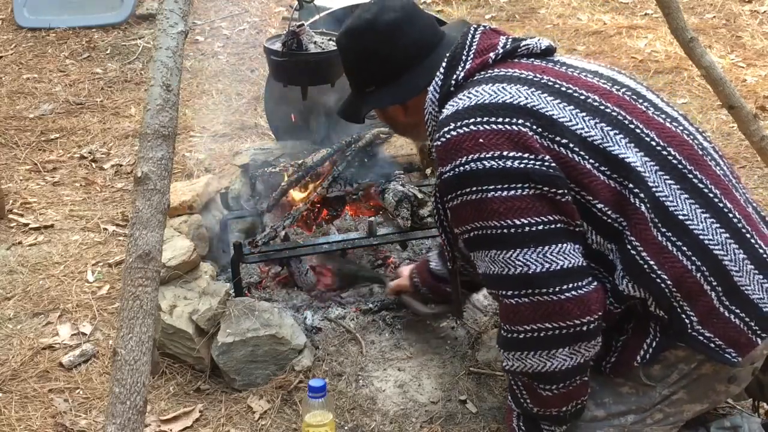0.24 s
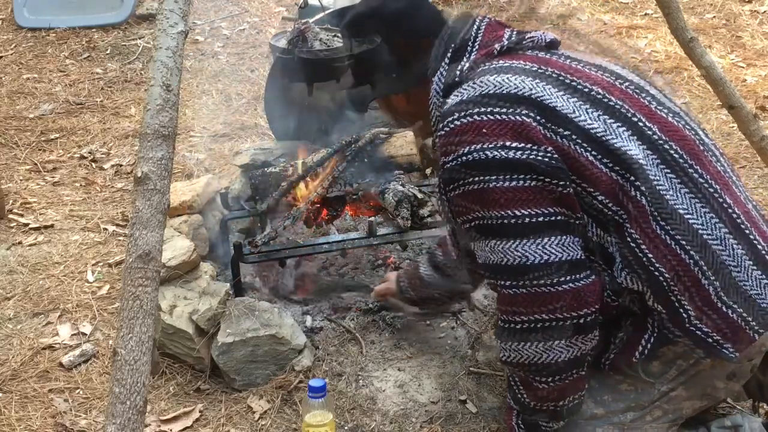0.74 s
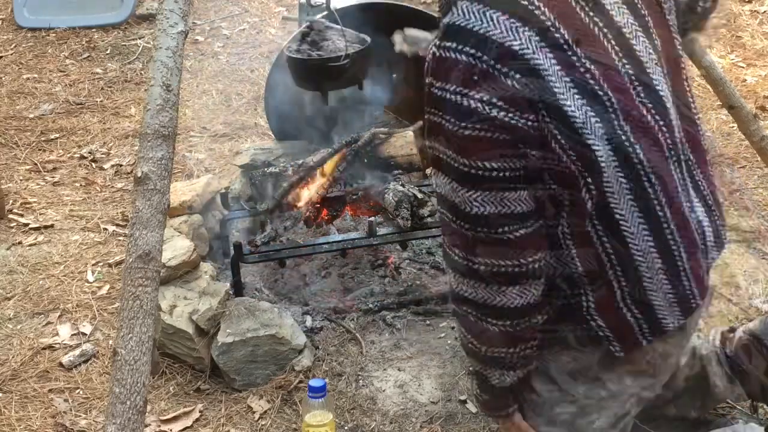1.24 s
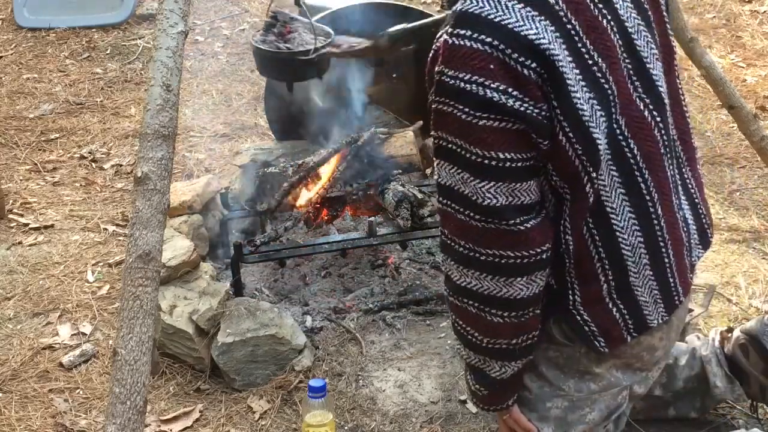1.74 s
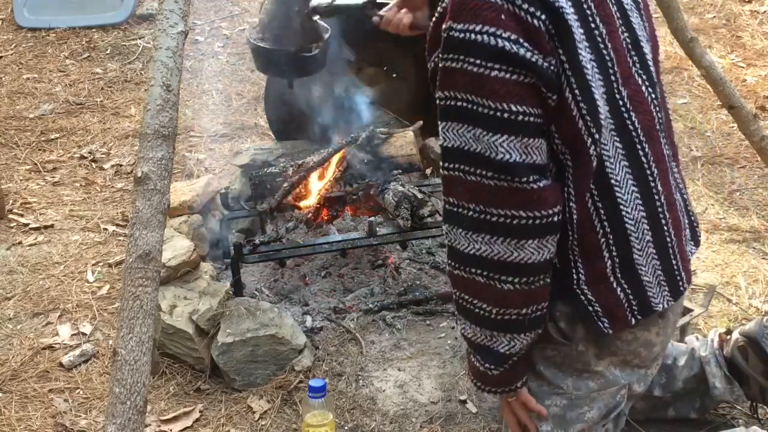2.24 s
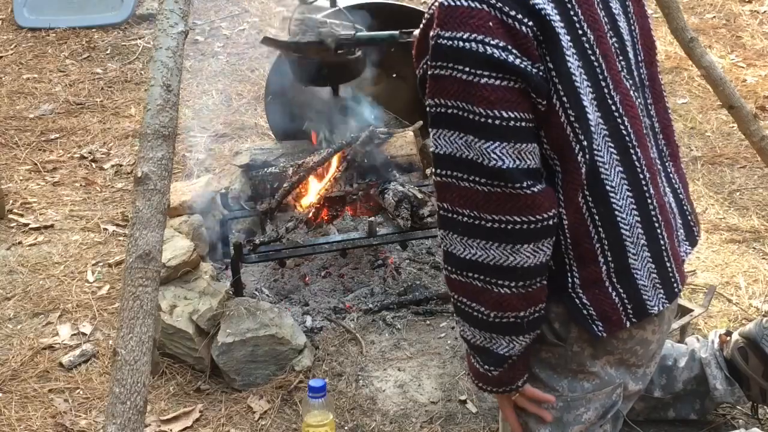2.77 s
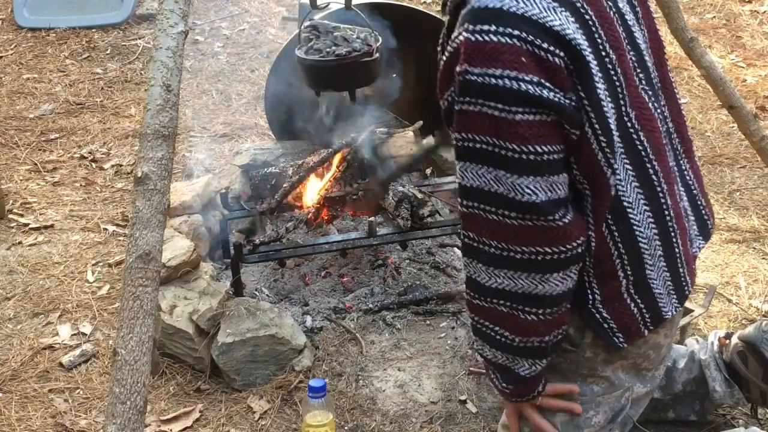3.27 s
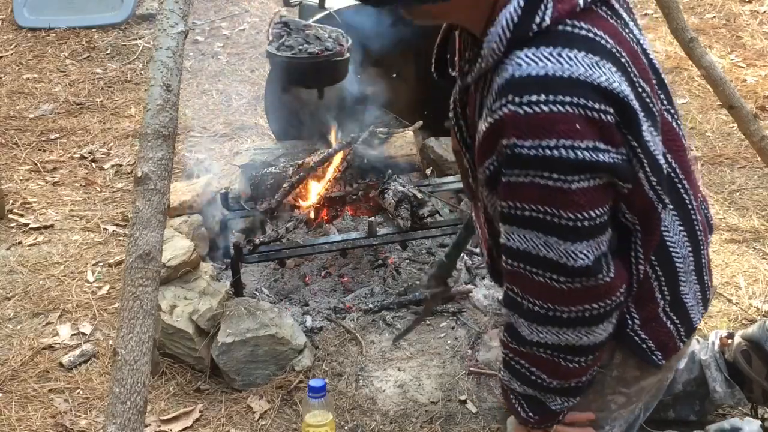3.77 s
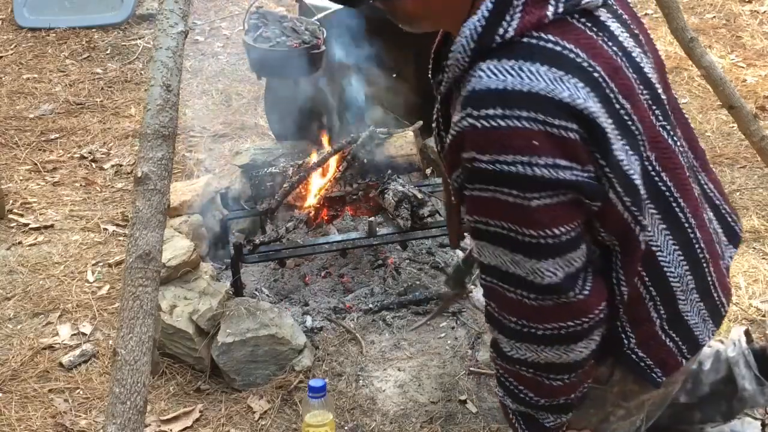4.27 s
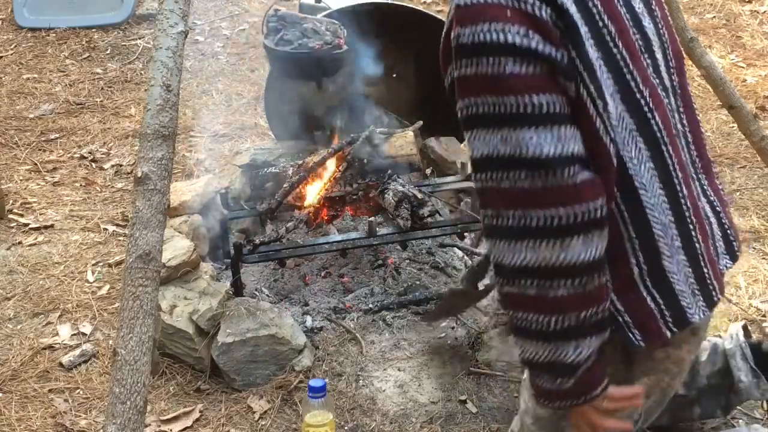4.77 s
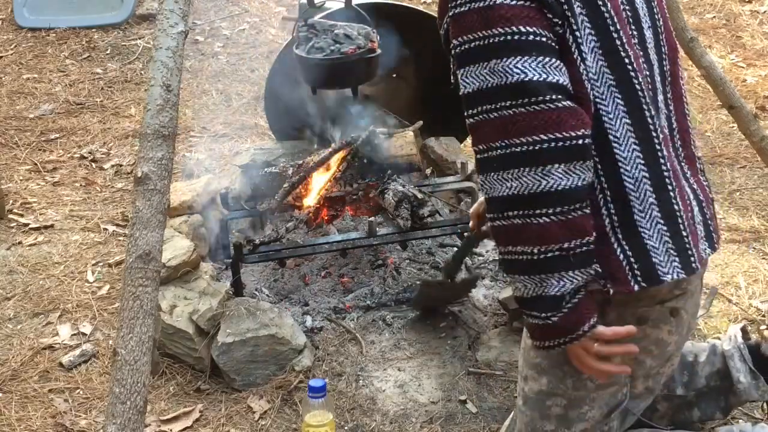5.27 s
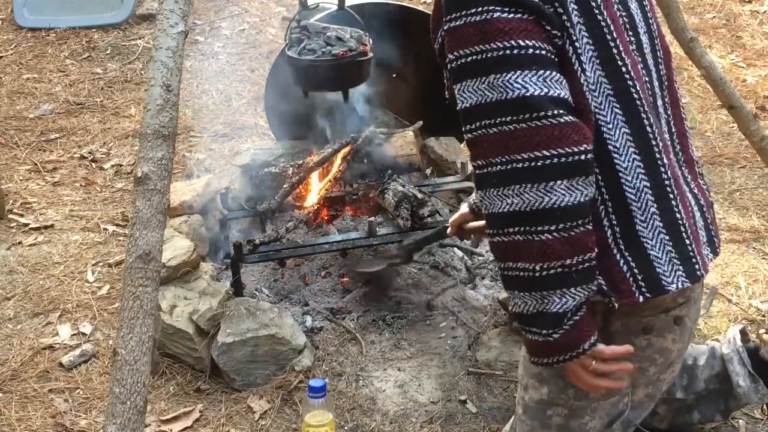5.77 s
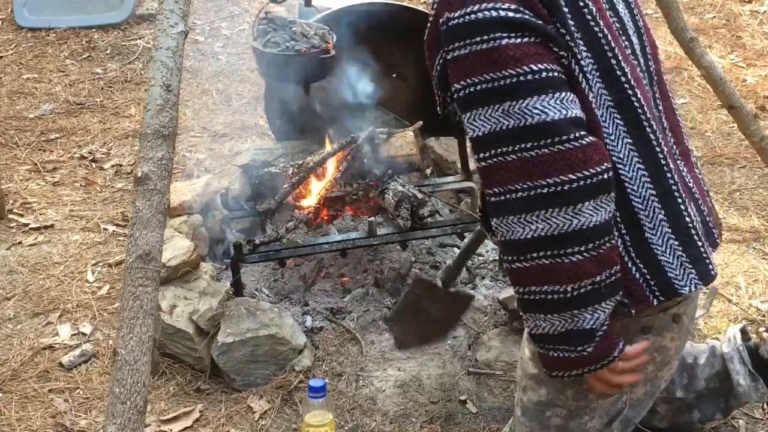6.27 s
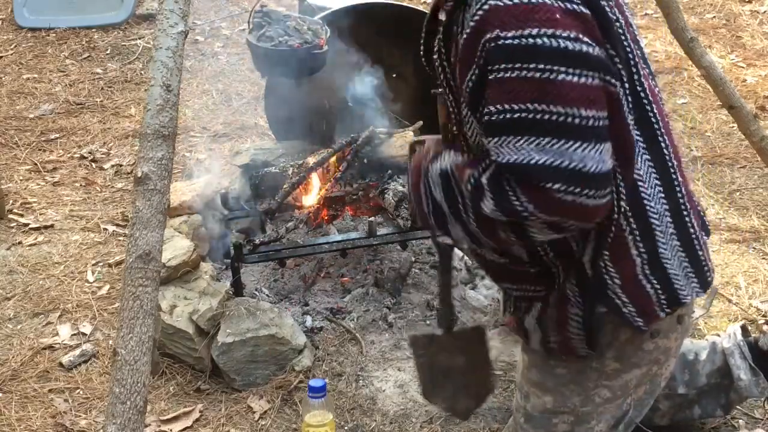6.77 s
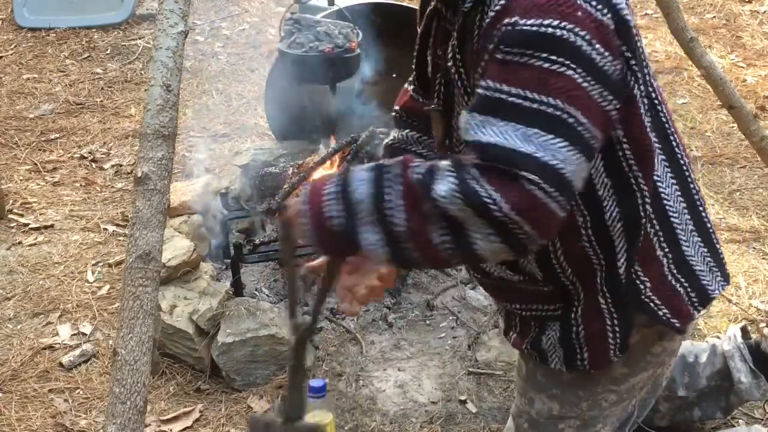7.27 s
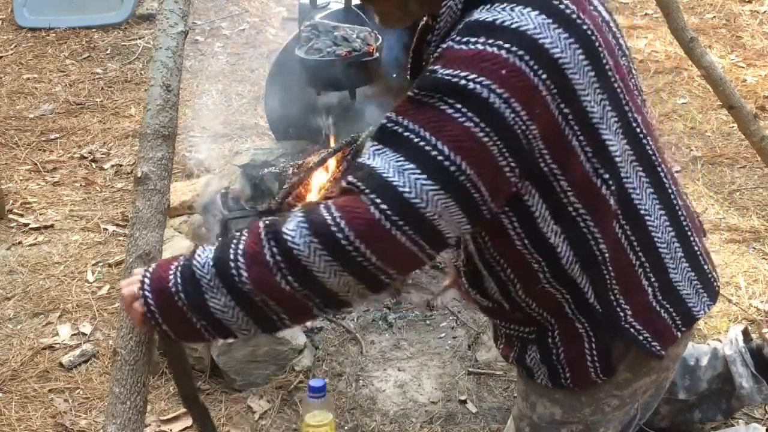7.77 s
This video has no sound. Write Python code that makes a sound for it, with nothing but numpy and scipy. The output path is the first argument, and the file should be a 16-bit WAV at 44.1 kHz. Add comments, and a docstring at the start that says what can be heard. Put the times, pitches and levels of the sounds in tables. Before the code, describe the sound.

Outdoors, close to a small fire, a steel shovel pushes through embers from 0 to about 1 second: short gritty scrapes, small stony crunches and a brief edge squeal. Then it is quiet, with sparse dry fire ticks, soft low rumble, thin hiss and a faint low hum. At 2.3 seconds the shovel hits an iron pot, a single loud, hard clang, by far the loudest sound. Its dense crash dies quickly, leaving a clear, gently pulsing note around 1200 hertz that fades until it is damped near 4 seconds; a faint tail returns from trees. Small bright clinks come around 3 and 4.1-4.4. Quieter scraping, a squeal and soft bumps run from 5.1 to 6.1, with clinks and light handle knocks from 6.3 to 7.4. Very faint high bird chirps sound at 7.2-7.7. At 7.75 the blade stabs gritty soil with a strong short crunch and knock.

```python
"""Iron and steel at a campfire

A small steel shovel scoops embers as grain noise, strikes an iron pot once and sings on as damped modes,
then scrapes the ash again and is stabbed into the ground in bursts of noise and short modes. Loose metal
fittings clink in two banks of modes, the edge squeals in narrow-band noise, the handle knocks and the fire
ticks. A faint decaying tail answers from the trees, over rumble, a rush of air, hiss, a low hum and a bird."""
import sys
import numpy as np
from scipy import signal
from scipy.fft import rfft, irfft, next_fast_len
from scipy.io import wavfile
from scipy.ndimage import map_coordinates

SR = 44100
rng = np.random.default_rng(int(sys.argv[2]) if len(sys.argv) > 2 else 0)


def persist_wave(psi):
    """Save psi, clipped to +-1, as 16-bit WAV."""
    counts = np.round(np.clip(psi, -1, 1) * 32767).astype(np.int16)
    wavfile.write(sys.argv[1], SR, np.atleast_2d(counts).T)


N = 353682
TIME = np.arange(N) / SR

# Modes of blade and pot struck together. Each row: frequency in Hz, relative level in dB, t60 in s.
IRON_MODES = [(190, -24, .13), (440, -24, .1), (606, -24, .11), (680, -26, .11), (729, -27, .18),
              (875, -26, .14), (915, -21, .17), (1079, -22, .13), (1200, -20, .17), (1312, -20, .14),
              (1478, -20, .13), (1573, -20, .12), (1760, -21, .13), (1884, -10, .18), (2064, -21, .15),
              (2189, -23, .13), (2359, -21, .16), (2429, -25, .14), (2576, -21, .17), (2692, -23, .14),
              (3351, -17, .26), (3590, -26, .15), (3690, -21, .19), (3818, -29, .17), (4448, -24, .19),
              (4616, -32, .28), (5308, -25.5, .22), (5953, -26, .22), (6117, -26, .16), (8920, -31, .12)]
# Spectrum of the blow's dense weak modes. Each row: frequency in Hz, relative density in dB.
CRASH_SPECTRUM = [(30, -50), (100, -23), (300, -20), (460, -8), (900, -12), (1500, -6), (2600, -11.5),
                  (3050, -17.5), (3600, -5.5), (4200, -16), (5600, -11.5), (7500, -16.5), (8200, -22.5),
                  (12200, -21.5), (15200, -33)]
# Decay of those weak modes. Each row: frequency in Hz, t60 in s.
CRASH_DECAY_TIMES = [(150, .12), (500, .13), (1500, .14), (3500, .15), (6000, .175), (10000, .155),
                     (15000, .135)]
# Modes of the freed blade. Each row: frequency in Hz, relative level in dB, t60 in s before shared losses.
BLADE_MODES = [(1205.5, 0, 90), (1039, -17, 2), (1965, -9.5, 1.1), (3357, -19, .6), (3612, -8, .62),
               (4619, -26, .35), (5280, -26, .5), (5958, -18, .33)]
# The blade's note fades evenly, swells slowly, drops a step as the blade turns away, and is damped at last.
SING_DB, SING_FADE_DB_PER_S = -26, 16.5
SWELL_PER_S, SWELL_DB = 2.67, 1.4
TURN_AFTER_S, TURN_TAKES_S, TURN_DB = 0.42, 0.11, -5
DAMPED_AFTER_S, DAMPED_DB_PER_S = 1.59, 78
CLANG_S = 2.337
GRAZE_S, GRAZE_DB, GRAZE_HZ = 0.03, -50, 2300  # the blade grazes the pot just before the blow

# Pushes of the shovel through embers. Each row: start in seconds, length in s before release,
# level in dB, pressure 0-1.
PUSH_EVENTS = [(0, 0.078, -58, 0.4), (0.077, 0.048, -44, 0.8), (0.169, 0.042, -51.5, 0.73),
               (0.289, 0.024, -50, 0.45), (0.332, 0.093, -45.5, 0.48), (0.425, 0.13, -53, 1),
               (.562, 0.079, -51.5, 0.6), (0.677, 0.2, -66, 0.55), (0.772, 0.029, -58, .85),
               (0.935, 0.21, -75, 0.8), (5.127, 0.027, -52.5, 0.03), (5.151, 0.026, -46.5, 0.18),
               (5.215, 0.038, -49, 0.5), (5.328, .013, -58.5, .4), (5.386, 0.033, -59, .6),
               (5.48, 0.096, -64, .3), (5.563, 0.28, -55.5, 0.11), (5.909, 0.026, -62.5, 0.2),
               (6.123, 0.019, -59, 0), (7.746, 0.026, -43.5, 0.8)]
PUSH_ATTACK_S, PUSH_SAG_DB_PER_S, PUSH_RELEASE_T60_S = 0.012, 22.5, 0.18
# Spectrum of sliding embers. Each row: frequency in Hz, relative density in dB.
GRIT_SPECTRUM = [(1180, -53), (2000, -5.5), (5490, -2), (6360, 2), (7250, -0.5), (14300, 1), (15600, -2),
                 (16000, -35.5)]
# Spectrum of the pressed blade's rasp. Each row: frequency in Hz, relative density in dB.
RASP_SPECTRUM = [(200, -4), (450, 2), (850, -3.5), (1300, -0.5), (2500, -7.5), (5000, -6), (7500, -12.5),
                 (12000, -6.5), (15500, -33)]
# Resonances of the blade while it rubs. Each row: frequency in Hz, bandwidth in Hz, relative level in dB.
STEEL_RESONANCES = [(1320, 110, -10), (2430, 260, -9.5), (3490, 170, -10), (5180, 67, -15), (6170, 19, 0),
                    (7330, 73, -15), (8700, 62, -11), (10200, 460, -13.5), (10200, 77, -23),
                    (12100, 180, -22)]

# The edge catches. Each row: start in seconds, length in s, level in dB, favoured frequency in Hz.
CATCH_EVENTS = [(.38, 0.044, -38, 1290), (0.441, .22, -57, 1960), (0.6, 0.026, -46.5, 5100),
                (0.836, 0.32, -78, 6300), (5.225, 0.062, -44.5, 2730), (6.29, 0.063, -58, 12400),
                (6.371, 0.045, -52.5, 2900), (7.797, 0.037, -47, 5150)]
# Notes at which the edge squeals. Each row: frequency in Hz, width in Hz, relative level in dB.
EDGE_NOTES = [(1290, 130, -21), (1954, 13, -8), (2470, 23, -12.5), (2920, 36, -10), (5060, 110, -12.5),
              (6335, 66, 0), (7350, 90, -15), (12400, 590, -17)]
FAVOUR_DB = 17.5  # lift of the note on which the edge catches

# The blade bites stony soil and embers. Each row: start in seconds, time it keeps sinking in s,
# relative level in dB, relative body level in dB.
BITE_EVENTS = [(0.076, .005, -38, -14), (.103, .005, -25, -12), (.347, .005, -32.5, -32),
               (.385, .028, -28.5, -13), (.607, .005, -33, -27), (7.764, .039, -13.5, -7.5)]
# Spectrum of the crunch. Each row: frequency in Hz, relative density in dB.
SOIL_SPECTRUM = [(88, -50), (150, -2), (391, -32), (524, -8), (1260, 3), (2220, -10), (2450, -12),
                 (3920, 2), (4760, -4.5), (6260, -1), (12700, -13.5), (15100, -26), (16000, -43)]
CRUNCH_GAP_S, CRUNCH_LOSS_DB, BODY_LOSS_DB = 0.0108, 0.2, 3  # from one stone giving way to the next

# Contacts of the loose metal. Each row: start in seconds, relative level in dB, brightest frequency in Hz,
# hook share 0-1.
CLINK_EVENTS = [(2.967, -36, 5120, 0.43), (3.032, -46.5, 12500, 0.35), (3.1, -46.5, 12450, 0.17),
                (4.079, -43.5, 10400, .3), (4.157, -42.5, 5400, 0.46), (4.308, -27, 6450, 0.08),
                (4.403, -33, 5800, 0.34), (5.398, -44.5, 3440, 0), (6.288, -39.5, 12200, 0.2),
                (6.34, -46.5, 5060, .7), (6.375, -43.5, 2950, 0.33), (6.973, -35.5, 5030, 0.4),
                (7.099, -42.5, 11740, 0.15)]
# Modes of the pot hanger's bail. Each row: frequency in Hz, relative level in dB, t60 in s.
BAIL_MODES = [(1820, -23.5, 0.3), (2800, -30, 0.079), (3830, -24, 0.31), (5170, -9.5, 0.11),
              (5800, -27, 0.13), (5930, -6.5, 0.088), (6000, -16, .09), (7100, -18, 0.26),
              (7910, -13.5, .09), (8600, -14, .2), (9380, -13, 0.09), (10700, -11, 0.1), (11650, -22, 0.37),
              (12040, -18, .09)]
# Modes of its hook. Each row: frequency in Hz, relative level in dB, t60 in s.
HOOK_MODES = [(3550, -5, 0.1), (4790, -26, 0.07), (4870, -18, 0.11), (5230, -12.5, 0.083),
              (5310, -2.5, 0.076), (5800, -24, 0.031), (6400, -10.5, 0.11), (6570, -5.5, 0.15),
              (9150, -2.5, 0.13), (10100, -6.5, 0.12), (11950, -3.5, 0.12), (12350, -14, 0.32),
              (13240, -13, 0.23)]
REBOUND_S, REBOUND_DB = 0.01, -9.5  # mean gap between touches of one contact; level change at each

# Knocks of the shovel's handle and socket. Each row: start in seconds, rattling time in s,
# then relative levels in dB of the whole, the thud and the edge.
KNOCK_EVENTS = [(5.2651, .01, -42, -3, 10.5), (5.9332, .03, -53, 2.5, 0), (6.4402, .01, -33, -22, -18),
                (7.3264, .01, -33, -16, -26), (7.3366, .03, -36.5, -19, -16),
                (7.3841, .05, -38.5, -11, -12), (7.7156, .01, -32.5, -29, 3), (7.87, .01, -34, -1, -4.5)]
# Modes of the held handle. Each row: frequency in Hz, width in Hz, relative level in dB.
HANDLE_MODES = [(1400, 29, -1.5), (2180, 51, -1), (2340, 29, 4.5), (2880, 22, -22), (3750, 24, -5),
                (4000, 22, -10.5)]
RATTLE_GAP_S, RATTLE_LOSS_DB = 0.019, 2  # from one contact of a rattle to the next
# Soft bumps on the ground. Each row: start in seconds, peak level in dB, frequency in Hz.
BUMP_EVENTS = [(0.569, -54, 126), (5.2, -57, 150), (5.262, -41, 185), (5.334, -49.5, 130),
               (5.933, -48, 107), (7.873, -57, 254)]

# Clear snaps of the fire. Each row: start in seconds, relative level in dB, centre frequency in Hz.
SNAP_EVENTS = [(.179, -36.5, 4200), (0.5258, -31.5, 9100), (.9229, -46, 6400), (1.0933, -37, 9300),
               (1.94, -48, 3340), (3.245, -45.5, 4600), (3.9934, -40.5, 5140), (4.261, -40, 5200),
               (4.4815, -36, 3800), (4.5248, -35, 4900), (5.1188, -36.5, 4100), (5.449, -32, 6000),
               (5.8373, -38, 9000), (5.9199, -40, 3300), (6.5795, -40.5, 5070), (6.9154, -36, 13000)]

# Decay of the trees' answer. Each row: frequency in Hz, t60 in s.
TREE_DECAY_TIMES = [(150, .5), (1000, 1.0), (2200, 1.4), (4000, 0.86), (8000, .65), (15000, 0.46)]
# Spectrum of the open air. Each row: frequency in Hz, relative density in dB.
AIR_SPECTRUM = [(15, -49.5), (25, -15), (70, -2), (123, -3), (200, -10), (270, -17.5), (317, -15.5),
                (489, -21), (575, -23.5), (1100, -23.5), (3080, -28.5), (5140, -32), (12200, -36),
                (14400, -36), (16000, -53)]
# Swell of the far rush of air. Each row: time in seconds, mean level in dB.
RUSH_LEVELS = [(0, -70.5), (2.2, -67), (4.6, -63), (6.5, -65), (8.02, -65.5)]
RUMBLE_DB, HISS_DB = -59.5, -71.5
HUM_DB, HUM_FADES_AT_S, HUM_FADE_DB_PER_S = -61.5, 2.63, 18  # a far low hum that dies away
HUM_HZ, HUM_RISE_HZ_PER_S = 119, 3
# A far bird's run of thin calls, with mean pitch at the top of the arch and mean level.
BIRD_START_S, BIRD_GAP_S, CHIRP_S, BIRD_HZ, BIRD_DB = 7.16, 0.103, 0.068, 7390, -76
TREES_DB = -31.5
TOP_HZ = 15500


def amp(db):
    """Decibels are a logarithmic measure of gain."""
    return 10 ** (np.asarray(db) / 20)


def unit(x):
    """Normalisation by mean power: rms 1."""
    return x / np.sqrt(np.mean(x ** 2) + 1e-20)


def peaked(x):
    """Normalisation by largest excursion: peak 1."""
    return x / np.abs(x).max()


def along(points, hz):
    """Interpolation of (Hz, value) points on a logarithmic frequency axis."""
    f, v = np.transpose(points)
    return np.interp(np.log(hz + 1), np.log(f + 1), v)


def wobble(rate):
    """Slow random modulation: a smooth curve through random knots, rate of them a second."""
    knots = rng.standard_normal(int(N * rate / SR) + 4)
    return map_coordinates(knots, [TIME * rate])


def filtered(x, response):
    """Linear filtering: the spectrum of x times a response of frequency."""
    m = next_fast_len(len(x) + 1024)
    return irfft(rfft(x, m) * response(np.fft.rfftfreq(m, 1 / SR)), m)[:len(x)]


def noise(response, size=N):
    """Coloured noise: filtered white noise, rms 1."""
    return unit(filtered(rng.standard_normal(size), response))


def shape(points):
    """Spectral envelope: the response through (Hz, dB) points."""
    return lambda hz: amp(along(points, hz))


def hump(hz, centre, octaves):
    """Broad resonance: a bell on the logarithmic frequency axis, with its deviation in octaves."""
    return np.exp(-0.5 * (np.log2((hz + 1) / centre) / octaves) ** 2)


def fade(t60, size):
    """Exponential decay: 60 dB lost in t60 seconds."""
    return amp(-60 * TIME[:size] / t60)


def ring(modes, size):
    """Modal synthesis: a sum of damped sines, each at a random phase."""
    total = np.zeros(size)
    for hz, db, t60 in modes:
        sine = np.sin(2 * np.pi * (hz * TIME[:size] + rng.random()))
        total += amp(db) * fade(t60, size) * sine
    return total


def shards(low_hz, high_hz, t60, size, count):
    """Random modes: short rings drawn anew for every point of contact, peak 1."""
    modes = []
    for u, v, w in rng.random((count, 3)):
        modes.append((low_hz * (high_hz / low_hz) ** u, 9 * v, t60 * (0.5 + w)))
    return peaked(ring(modes, size))


def dying(x, decay):
    """Frequency-dependent damping: each band of x decays at its own speed."""
    hz, t, bands = signal.stft(x, SR, nperseg=256)
    loss = amp(-60 * t / along(decay, hz)[:, None])
    return signal.istft(bands * loss, SR, nperseg=256)[1][:len(x)]


def add(track, s, x):
    """Superposition: x is mixed into the track at time s."""
    i = max(round(s * SR), 0)
    track[i:i + len(x)] += x[:N - i]


def blow():
    """Impact excitation: steel grazes iron, then strikes strong modes and a dense crash of weak ones."""
    out, size = np.zeros(N), SR
    # level of the blow in dB: up slightly, a brief dip, then steady
    level_db = np.interp(TIME[:size], [0, 0.028, 0.04, 0.07], [1.5, 2.6, 0.0, 2.0])
    crash = amp(-14) * dying(noise(shape(CRASH_SPECTRUM), size), CRASH_DECAY_TIMES)
    iron = amp(-0.88) * ring(IRON_MODES, size)
    onset = 1 - fade(0.0019, size)
    add(out, CLANG_S, amp(level_db) * (crash + iron) * onset)
    graze = noise(lambda hz: hump(hz, GRAZE_HZ, 0.79), size) * (TIME[:size] < GRAZE_S)
    add(out, CLANG_S - GRAZE_S, amp(GRAZE_DB) * graze)
    # a high-pass at 80 Hz keeps deep bass out of the clang
    return signal.lfilter(*signal.butter(2, 80, "high", fs=SR), out)


def singing_blade():
    """Free vibration: the freed blade's modes decay, swelling and sinking at a steady slow rate, and drop a
    step as it turns."""
    out, t = np.zeros(N), TIME[:3 * SR]
    swell_db = SWELL_DB * np.cos(2 * np.pi * SWELL_PER_S * t)
    turn_db = TURN_DB * np.clip((t - TURN_AFTER_S) / TURN_TAKES_S, 0, 1)
    loss_db = SING_FADE_DB_PER_S * t + DAMPED_DB_PER_S * np.maximum(t - DAMPED_AFTER_S, 0)
    add(out, CLANG_S, amp(SING_DB + swell_db + turn_db - loss_db) * ring(BLADE_MODES, len(t)))
    return out


def grains(rate, response, spread_db):
    """Granular excitation: dense tiny impacts of uneven size, filtered to rms 1."""
    hits = (rng.random(N) < rate / SR) * rng.choice([-1, 1], N)
    sizes = amp(spread_db * np.minimum(rng.standard_normal(N), 2))
    return unit(filtered(hits * sizes, response))


def rubbed_steel(f):
    """Driven resonance: the blade's complex response, with neighbouring modes in opposite sign."""
    total = 0
    for k, (centre, width, db) in enumerate(STEEL_RESONANCES):
        damping = 1j * f * width
        total = total + (-1) ** k * amp(db) * damping / (centre * centre - f * f + damping)
    return total


def scrapes():
    """Granular friction: embers slide over the blade; pressure turns sliding into rasp and rattle."""
    sliding, pressing, t = np.zeros(N), np.zeros(N), TIME[:SR]
    for s, length, db, pressure in PUSH_EVENTS:
        release_db = 60 * np.maximum(t - length, 0) / PUSH_RELEASE_T60_S
        attack = np.minimum(t / PUSH_ATTACK_S, 1)
        level = attack * amp(db - PUSH_SAG_DB_PER_S * t - release_db)
        add(sliding, s, np.sqrt(1 - pressure) * level)
        add(pressing, s, np.sqrt(pressure) * level)
    grit = grains(1800, shape(GRIT_SPECTRUM), spread_db=5.5)
    rasp = grains(1400, shape(RASP_SPECTRUM), spread_db=4.5)
    rattle = grains(400, rubbed_steel, spread_db=2)
    # the embers give way in clumps
    stick_slip = amp(2.1 * wobble(110) + 1.9 * wobble(35) - 0.97)
    return stick_slip * (sliding * grit + pressing * unit(rasp + rattle))


def edge_notes(f):
    """Resonant peaks: the narrow notes of the edge, side by side."""
    return sum(amp(db) / (1 + ((f - hz) / width) ** 2) for hz, width, db in EDGE_NOTES)


def squeals():
    """Frictional squeal: a caught edge sounds its narrow notes together, one favoured."""
    out, size = np.zeros(N), SR // 3
    for s, length, db, favoured_hz in CATCH_EVENTS:
        u = np.clip(TIME[:size] / length, 0, 1)
        squeal = noise(lambda hz: edge_notes(hz) * amp(FAVOUR_DB * hump(hz, favoured_hz, 0.18)), size)
        add(out, s, amp(db) * squeal * np.sqrt(np.minimum(8 * u, 1) * (1 - u)))
    return out


def bites():
    """Brittle yielding: stones give way in quick crunches, each thinner and with its own short ring."""
    out, size = np.zeros(N), SR // 9
    soil = shape(SOIL_SPECTRUM)
    onset = 1 - fade(0.0046, size)
    decay = fade(0.032, size) + amp(-18.5) * fade(0.1, size)
    for s, length, db, body_db in BITE_EVENTS:
        for k, delay in enumerate(np.arange(0, length, CRUNCH_GAP_S)):
            lift_db = body_db + 13 - k * BODY_LOSS_DB
            crunch = noise(lambda hz: soil(hz) * amp(lift_db * hump(hz, 1600, 0.53)), size)
            stones = amp(3.5) * shards(1092, 10000, 0.054, size, count=22)
            burst = (crunch * decay + stones) * onset
            add(out, s + delay, amp(db - 11 - k * CRUNCH_LOSS_DB) * burst)
    return out


def fitting(modes, bright_hz, size):
    """Point excitation: each contact rebalances the modes and favours those near one pitch."""
    struck = []
    for hz, db, t60 in modes:
        struck.append((hz, db + rng.normal(0, 3.5) + 11 * hump(hz, bright_hz, 0.23), t60))
    return ring(struck, size)


def clinks():
    """Repeated impact: bail and hook ring, chatter and rebound at uneven gaps, ever more weakly."""
    out, size = np.zeros(N), SR // 6
    onset = 1 - fade(0.0081, size)
    for s, db, bright_hz, share in CLINK_EVENTS:
        bail = fitting(BAIL_MODES, bright_hz, size)
        hook = fitting(HOOK_MODES, bright_hz, size)
        splinter = shards(bright_hz / 2.5, min(bright_hz * 1.6, 15000), 0.056, size, count=24)
        metal = peaked((1 - share) * bail + share * hook) + amp(-8) * splinter
        gaps = REBOUND_S * (0.5 + rng.random(3))
        for k, delay in enumerate(np.cumsum(gaps) - gaps[0]):
            # the parts stay in loose touch and blur the ring
            flutter = 1 + 0.46 * noise(lambda hz: 1 / (1 + (hz / 150) ** 2), size)
            chatter = noise(lambda hz: hump(hz, bright_hz, 0.87), size) * fade(0.043, size)
            touch = (metal * flutter + amp(-14.5) * chatter) * onset
            add(out, s + delay, amp(db - 3.5 + k * REBOUND_DB) * touch)
    return out


def knocks():
    """Heavy damping: the held shovel rings only briefly, between a low thud and a gritty edge."""
    out, size = np.zeros(N), SR // 7
    onset = 1 - fade(0.0038, size)
    for s, length, db, thud_db, edge_db in KNOCK_EVENTS:
        for k, delay in enumerate(np.arange(0, length, RATTLE_GAP_S)):
            # a wider mode dies sooner
            modes = [(hz, level + rng.normal(0, 3.5), 2.8 / width) for hz, width, level in HANDLE_MODES]
            handle = amp(-6) * peaked(ring(modes, size))
            clack = amp(-8.5) * noise(lambda hz: hump(hz, 2370, 0.43), size)
            thud = amp(thud_db - 0.5) * noise(lambda hz: hump(hz, 800, 1.0), size)
            edge = amp(edge_db - 10.5) * noise(lambda hz: hump(hz, 6800, 0.61), size)
            knock = (handle + (clack + thud + edge) * fade(0.063, size)) * onset
            add(out, s + delay, amp(db - 4 - k * RATTLE_LOSS_DB) * knock)
    return out


def bumps():
    """Damped oscillation: soft ground answers with one low, short-lived mode."""
    out, size = np.zeros(N), SR // 7
    for s, db, hz in BUMP_EVENTS:
        add(out, s, amp(db) * peaked(ring([(hz, 0, 0.07)], size) * (1 - fade(0.025, size))))
    return out


def snap(centre_hz):
    """Pressure release: a gas pocket bursts in the wood, a sharp tick and its scatter off the stones."""
    size = SR // 20
    burst = noise(lambda hz: hump(hz, centre_hz, 0.85) * hz / (hz + 1500), size)
    return peaked(burst * (fade(0.0029, size) + amp(-11) * fade(0.014, size)))


def fire():
    """Random point events: clear snaps over a uniform scatter of tiny ones."""
    out = np.zeros(N)
    for s, db, hz in SNAP_EVENTS:
        add(out, s, amp(db + 0.5) * snap(hz))
    for when, strength, pitch in rng.random((150, 3)):
        add(out, when * TIME[-1], amp(-57.5 + 12 * strength ** 4) * snap(5000 + 8000 * pitch))
    return out


def trees(x):
    """Diffuse scattering: trunks and ground return a faint, dull tail, by convolution."""
    spectrum = [(100, -11), (700, -11.5), (1500, -2.5), (2600, -5.5), (4000, -6.5), (15000, -12)]  # Hz, dB
    tail = dying(noise(shape(spectrum), SR), TREE_DECAY_TIMES)
    return signal.fftconvolve(x, tail / np.linalg.norm(tail))[:N]


def bird():
    """Frequency modulation: an even run of thin, slightly arched whistles from far off."""
    out = np.zeros(N)
    arch = np.sin(np.pi * np.clip(TIME[:SR // 4] / CHIRP_S, 0, 1))
    for k, (pitch, strength) in enumerate(rng.standard_normal((6, 2))):
        hz = BIRD_HZ + 180 * pitch + 300 * (arch - 1)
        whistle = arch * np.sin(2 * np.pi * np.cumsum(hz) / SR)
        add(out, BIRD_START_S + k * BIRD_GAP_S, amp(BIRD_DB + 2 * strength) * whistle)
    return out


def hum():
    """Phase accumulation: a wavering low tone rises slowly in pitch and dies away."""
    hum_db = HUM_DB - HUM_FADE_DB_PER_S * np.maximum(TIME - HUM_FADES_AT_S, 0)
    hz = HUM_HZ + HUM_RISE_HZ_PER_S * TIME + 2.3 * wobble(5.4)
    return amp(hum_db + 1.6 * wobble(9.2)) * np.sin(2 * np.pi * np.cumsum(hz) / SR)


def outdoors():
    """Broadband noise: low rumble, a far rush of air and thin hiss share one air spectrum."""
    air = shape(AIR_SPECTRUM)
    rumble = noise(lambda hz: air(hz) * hz / (hz + 15) / (1 + (hz / 330) ** 4))
    rush = noise(lambda hz: air(hz) * hump(hz, 850, 0.91))
    hiss = noise(lambda hz: air(hz) * hz ** 2 / (hz ** 2 + 2500 ** 2))
    rumble *= amp(RUMBLE_DB + 1.5 * wobble(1.5))
    rush_s, rush_db = np.transpose(RUSH_LEVELS)
    rush *= amp(np.interp(TIME, rush_s, rush_db) + 0.41 * wobble(3.3))
    return rumble + rush + amp(HISS_DB) * hiss


def scene():
    """Superposition: everything near the fire, its echo and the wood around."""
    shovel = blow() + singing_blade() + scrapes() + squeals() + bites()
    near = shovel + clinks() + knocks() + bumps() + fire()
    return (near + amp(TREES_DB) * trees(near) + bird() + hum() + outdoors())[None]


def record(dry):
    """Saturation and band limiting: high peaks are rounded off, then a steep low-pass is applied."""
    rounded = dry[0] / (1 + np.abs(dry[0]) ** 6) ** (1 / 6)
    return filtered(rounded, lambda hz: 1 / (1 + (hz / TOP_HZ) ** 150))[None]


dry = scene()
out = record(dry)
persist_wave(out)
```